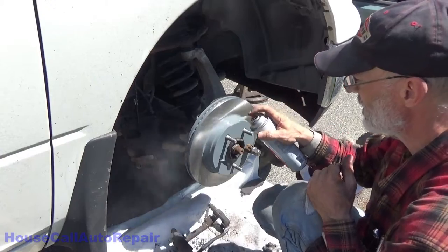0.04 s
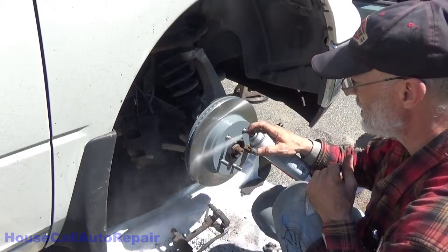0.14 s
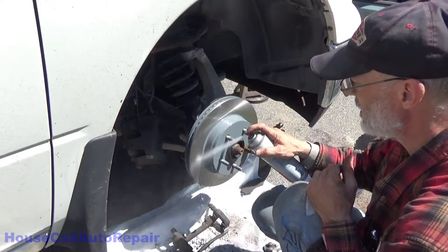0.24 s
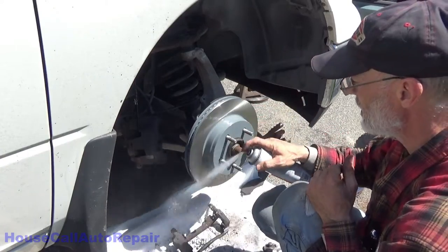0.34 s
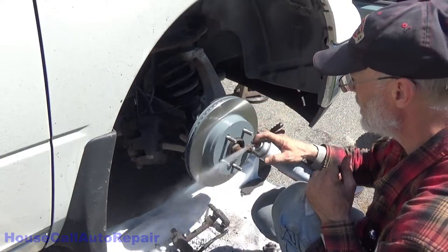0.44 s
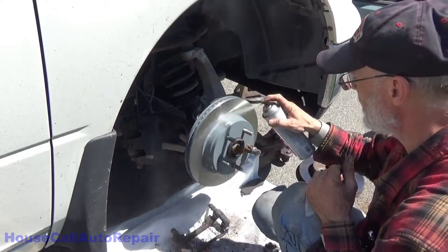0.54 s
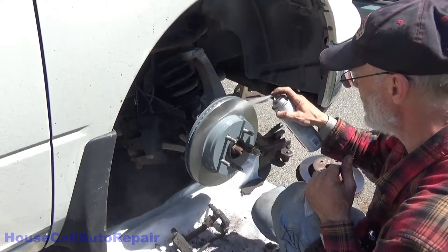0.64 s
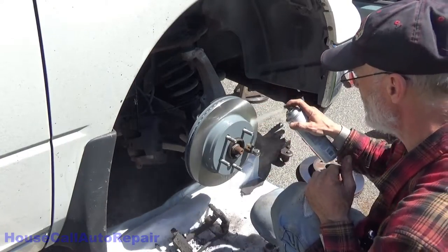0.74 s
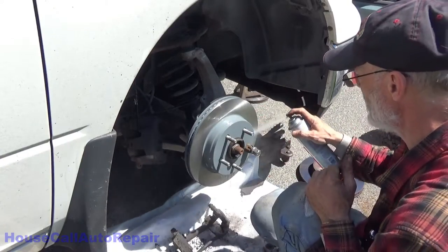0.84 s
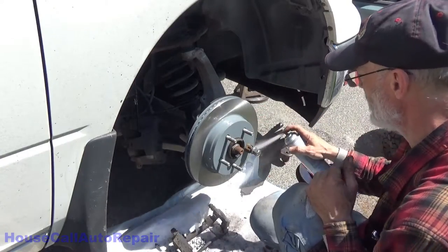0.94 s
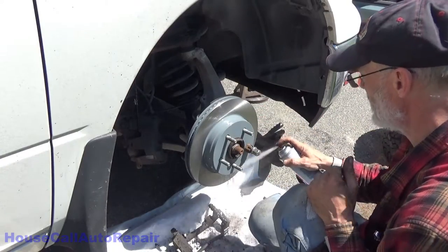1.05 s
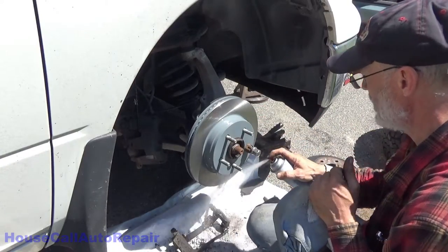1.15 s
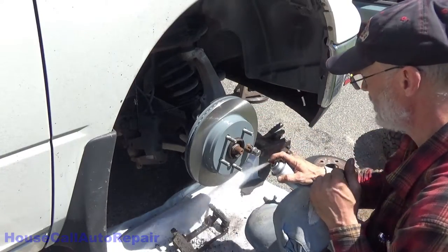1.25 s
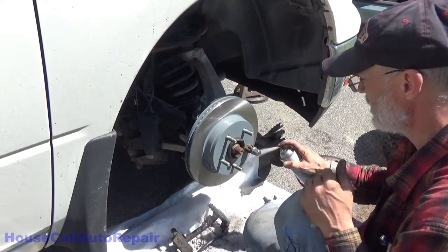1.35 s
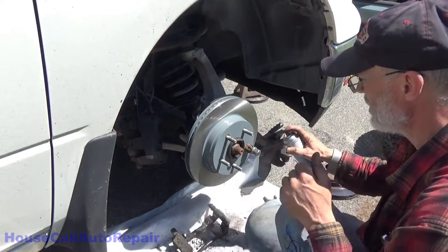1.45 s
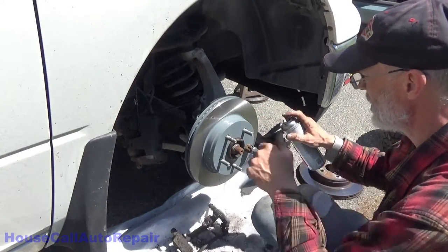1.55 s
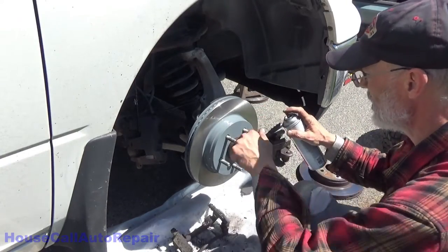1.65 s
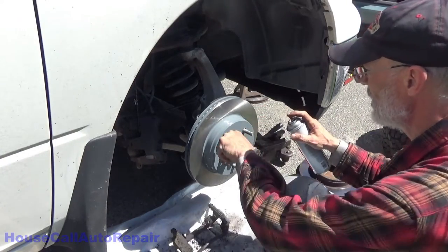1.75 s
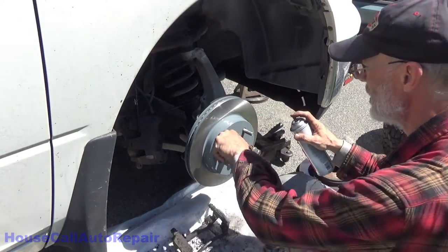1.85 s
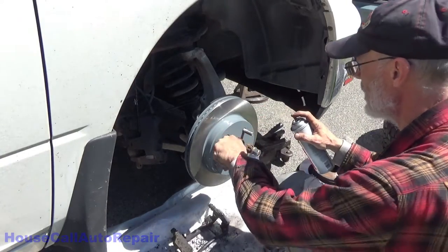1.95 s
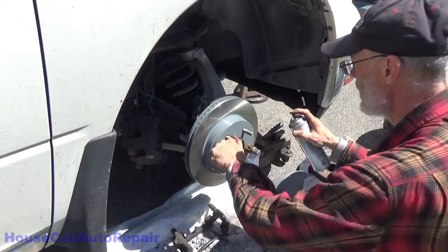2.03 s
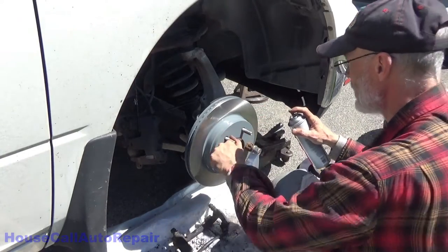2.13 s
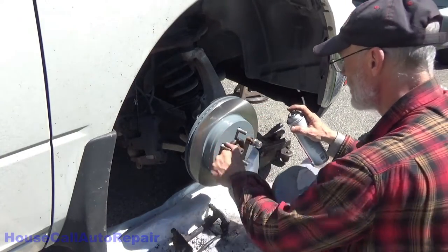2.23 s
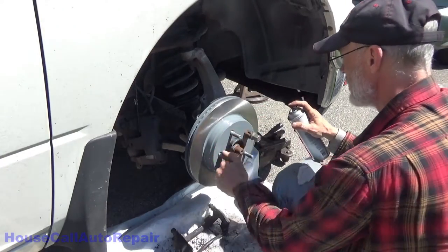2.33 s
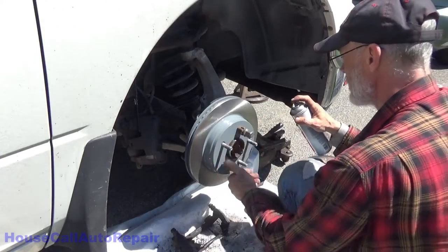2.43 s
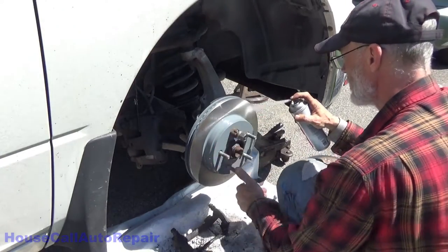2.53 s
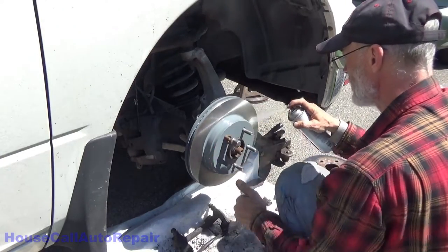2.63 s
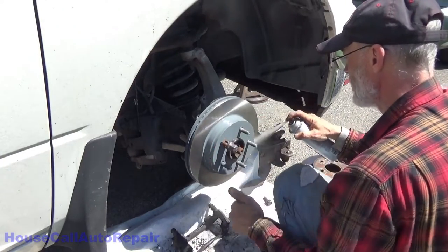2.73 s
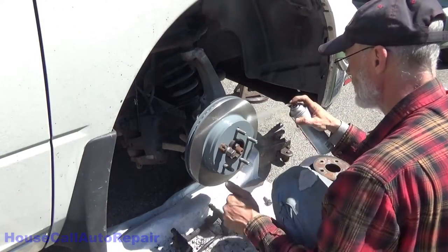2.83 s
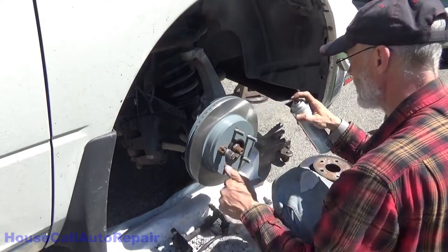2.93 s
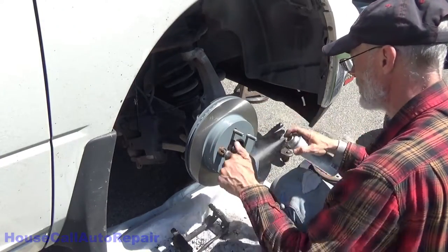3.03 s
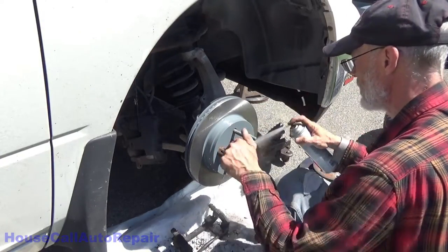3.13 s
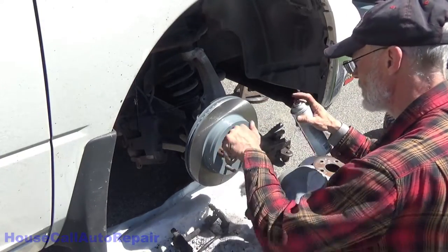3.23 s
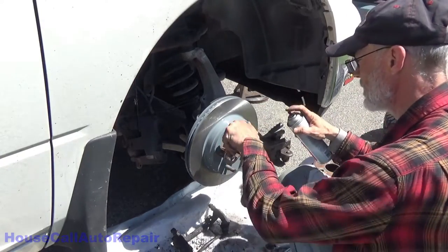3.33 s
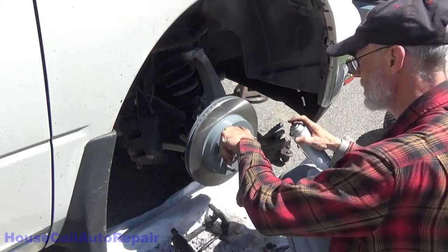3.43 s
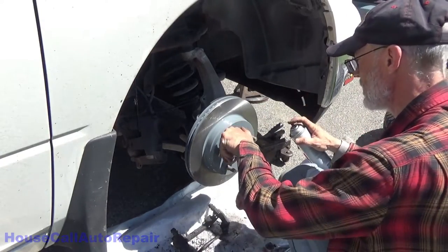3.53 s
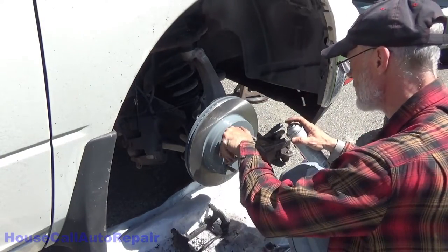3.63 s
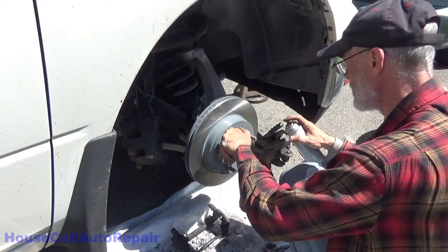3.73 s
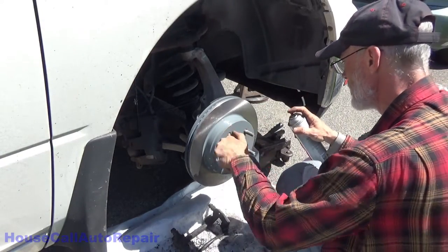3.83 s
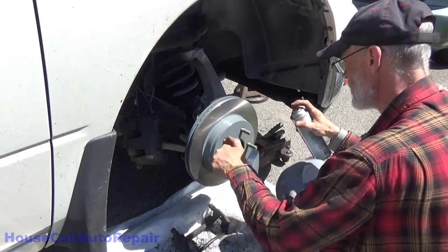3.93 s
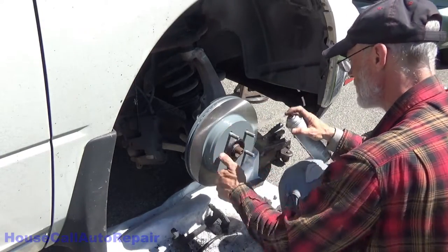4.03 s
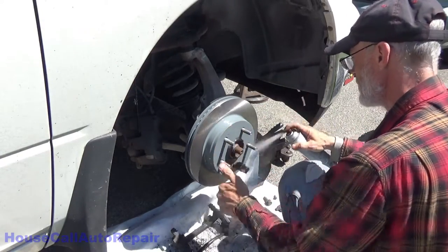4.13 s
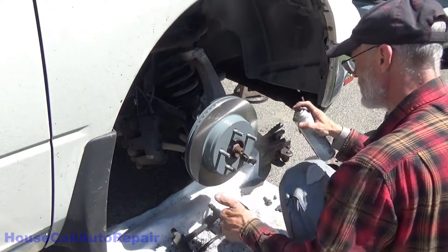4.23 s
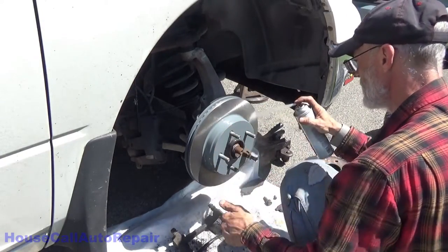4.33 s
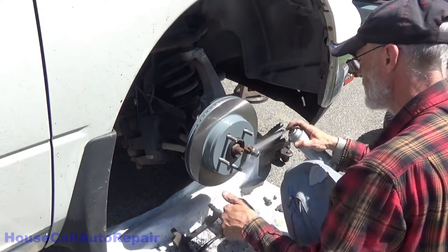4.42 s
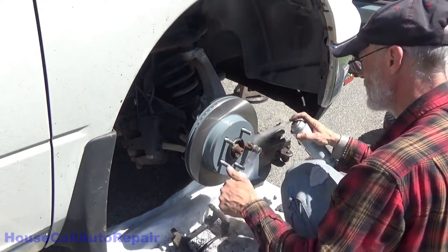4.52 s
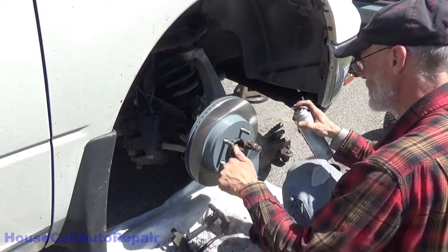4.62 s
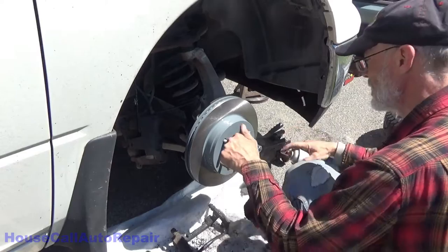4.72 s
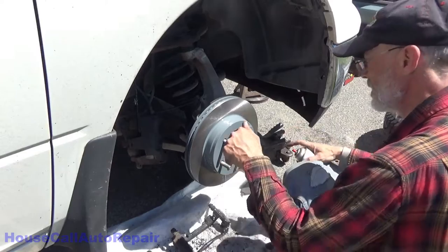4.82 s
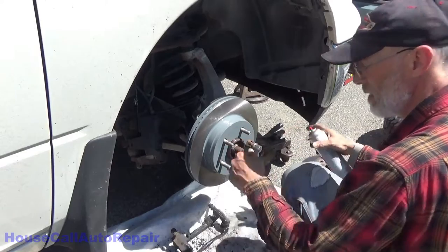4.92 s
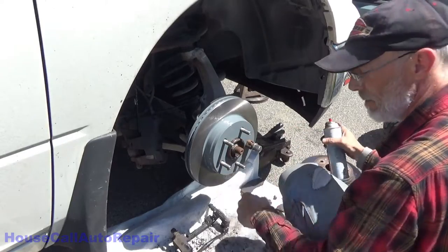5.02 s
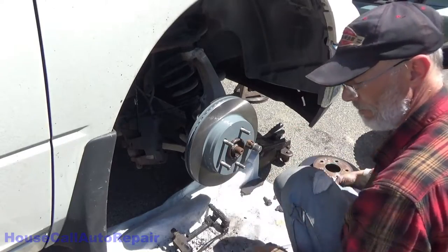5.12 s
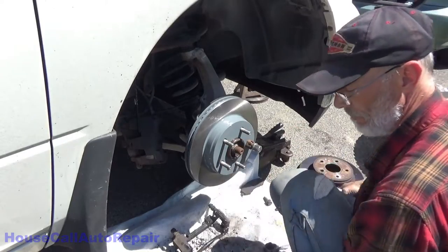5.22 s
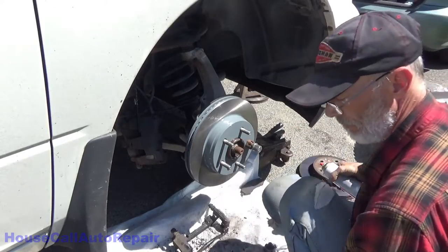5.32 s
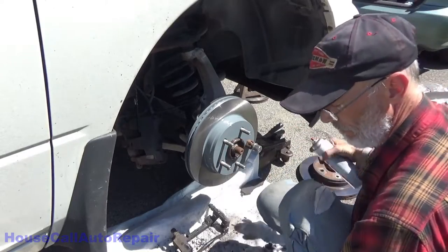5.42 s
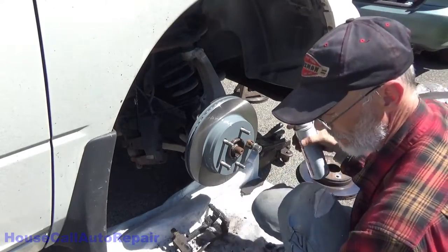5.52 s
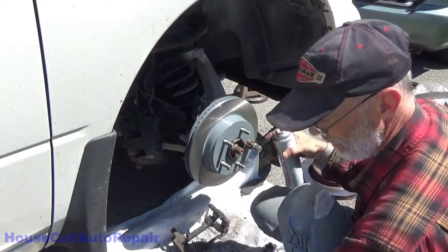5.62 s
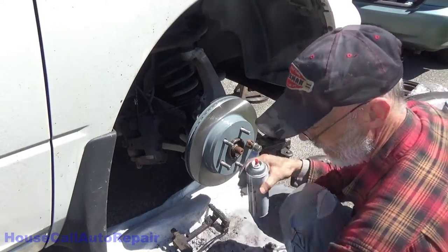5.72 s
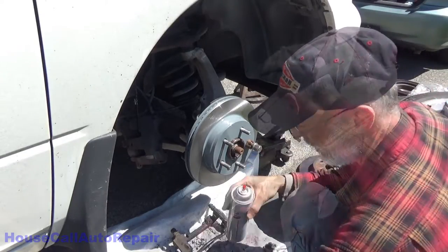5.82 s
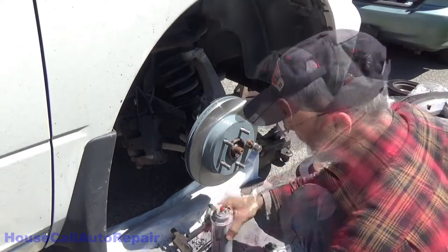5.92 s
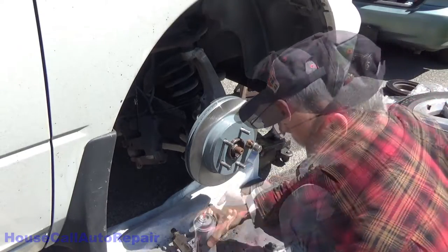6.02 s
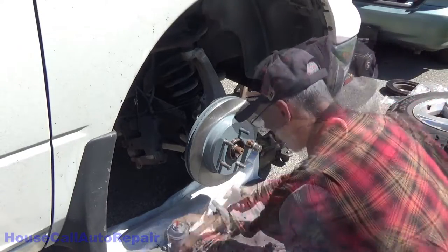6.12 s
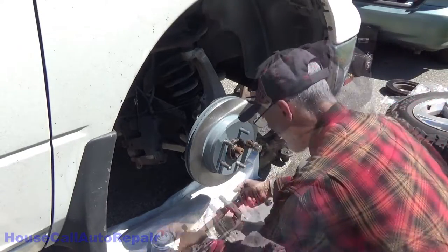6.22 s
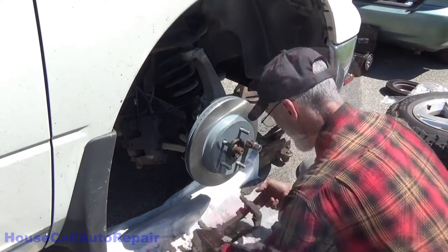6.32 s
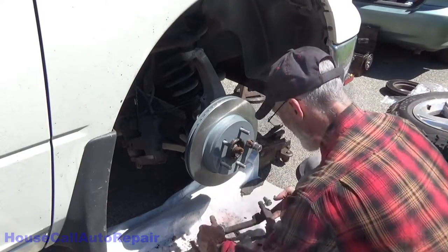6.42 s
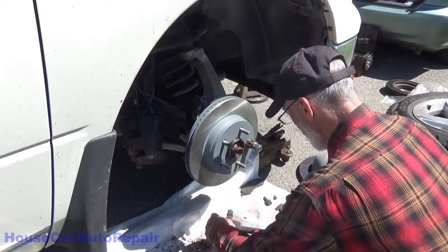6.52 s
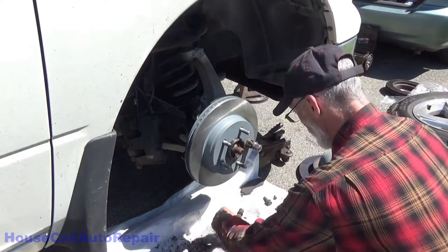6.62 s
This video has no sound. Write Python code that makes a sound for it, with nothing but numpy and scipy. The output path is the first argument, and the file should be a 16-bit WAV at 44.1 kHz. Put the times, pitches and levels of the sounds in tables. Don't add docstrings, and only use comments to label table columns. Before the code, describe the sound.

Outdoors beside a van, a loud, bright aerosol hiss is already running at 0 s, striking an iron brake disc. Its colour sweeps as the can moves, with gulping spatter and a breathy hollow tone rising around 1.1 to 1.4 s. It cuts off sharply at about 1.46 s, leaving a wet fizz that dies away, with small grit ticks and dull finger taps. At 2.5 s a tiny rising whistle opens a second jet, lasting until 3.2 s. More taps and ticks follow. A sharper chirp at 4.0 s starts a last, splashier jet, ending at 4.7 s. Around 5.1 to 5.4 s come a cluster of taps and two soft cloth strokes, then sparse clicks, one clearer at 6.2 s. Faint traffic wash, rustle and a low motor hum lie underneath, sinking after 5.7 s. The microphone is near, in stereo, with a short wheel-arch reflection.

```python
import sys
import numpy as np
from scipy import signal
from scipy.fft import rfft, irfft, next_fast_len
from scipy.io import wavfile
from scipy.ndimage import map_coordinates

SR = 44100
rng = np.random.default_rng(int(sys.argv[2]) if len(sys.argv) > 2 else 0)


def unload_wav(signal):
    wavfile.write(
        sys.argv[1],
        SR,
        np.round(np.clip(np.atleast_2d(signal).T, -1, 1) * 32767).astype(np.int16),
    )


def makeup_ratio(level_db):
    decades = np.asarray(level_db, float) / 20
    return 10 ** decades


N = 293645
TIME_S = np.arange(N) / SR

# [opens_s, shuts_s, rise_ms, fall_db_per_ms]
VALVE_PRESSES = [
    (-.1, 1.458, 3, 1.8),
    (2.532, 3.21, 8.4, 1.6),
    (4.0095, 4.701, 3, 1.6),
]
# [hiss_db, top_db over hiss, spatter_db, splash_db, stem_fill_s]
JET_STRENGTHS = [
    (-17.5, -6.5, -32, -44, .005),
    (-18, -8, -33.5, -46.5, 0.067),
    (-18, -7.5, -34.5, -47.5, .01),
]
# [pitch_hz, level_db per Hz]
HISS_COLOUR = [(2600, -11), (3300, -7.5), (3900, -1.5), (4800, -5), (5500, -7.5), (6200, -5.5),
               (7400, -3.5), (8400, -5), (9200, -7), (11000, -6.5), (12100, -11.5), (14100, -19.5),
               (15600, -24), (16500, -30)]
# [pitch_hz, level_db per Hz]
LIQUID_COLOUR = [(200, -23.5), (300, -18), (466, -8.5), (600, -14), (870, -10.5), (1170, -9), (1750, -3.5),
                 (2600, 0)]
# [pitch_hz, likeness 0-1]
JET_LIKENESS = [(300, 1), (700, 0.98), (1500, 1), (3000, 0.98), (4500, 1), (7000, 0.99), (10000, 0.96),
                (15000, .95)]
# [pitch_hz, balance_db]
JET_BALANCE = [(250, 0.1), (700, .4), (1500, 5.5), (3500, -2.4), (7000, 0.5), (12000, -0.5)]
# [start_s, disc_echo_ms, hub_echo share]
HAND_PATHS = [
    [(0, .415, 0), (.4, .4, -.05), (.62, .412, .05), (.8, .388, -.15), (.99, .365, -.22), (1.1, .38, -.28),
     (1.23, .42, -.32), (1.33, .4, -.3), (1.45, .382, -.25)],
    [(2.55, .425, .1), (2.8, .433, -.08), (3.05, .433, -.1), (3.2, .412, -.16)],
    [(4.02, .418, -.1), (4.2, .422, 0), (4.33, .44, -.07), (4.55, .44, -.2), (4.7, .434, -.1)],
]
# [offset_hz from its centre, level_db per Hz]
NOZZLE_SHAPE = [(5, 1), (600, -1), (900, -6.5), (1200, -14), (1600, -34)]
# [middle_s, splash_gain_db, spatter_gain_db]
LIQUID_GULPS = [(.032, 7.5, 1.5), (.08, 3.5, -2.5), (.36, 2, 0), (.584, 4.5, 0), (.69, -1, -1),
                (1.11, 6.5, 3.5), (1.25, 3.5, 0.5), (1.41, 7.5, 1), (2.6, 5, 2), (2.68, 3.5, 0),
                (2.95, 3, -1), (3.09, 6.5, 0.5), (4.045, 9, 7), (4.234, 11.5, -1), (4.374, 10, 1.5),
                (4.47, 5, 2)]
# [middle_s, half_length_s, pitch_hz, glide_hz_per_s, level_db]
HOLLOW_NOTES = [
    (.03, .14, 2835, -300, -31),
    (1.12, 0.075, 1805, 901, -34.5),
    (1.38, .2, 2110, 1250, -32),
    (3.0, .4, 2395, 0, -40.5),
    (4.05, .035, 1037, 1000, -35.5),
]
# [offset_hz from its centre, level_db per Hz]
HOLLOW_SHAPE = [(5, -1), (90, -4), (200, -9), (400, -27)]
# [start_s, pitch_hz, level_db]
VALVE_WHISTLES = [
    [(2.5, 2430, -55), (2.508, 2500, -40), (2.524, 2660, -33.5), (2.536, 2800, -33), (2.545, 2897, -50)],
    [(3.993, 2094, -60), (4.001, 2310, -39), (4.006, 2400, -40), (4.012, 2390, -26), (4.02, 2400, -44)],
]
# [multiple of the pitch, level_db]
WHISTLE_PARTIALS = [(1, -10), (2, -1), (3, -7.5), (4, -25)]
# [middle_s, half_length_s, level_db]
CLOTH_STROKES = [
    (5.17, 0.057, -48),
    (5.373, 0.069, -51.5),
]
# [pitch_hz, width_hz, level_db]
CLOTH_PEAKS = [(4960, 950, 1), (8300, 1200, -4)]
# [start_s, peak_db]
GRIT_TICKS = [(1.6342, -43), (1.8417, -40), (2.0906, -47), (2.1593, -44), (3.3544, -48), (3.4964, -45),
              (3.5753, -42), (3.5922, -42), (3.7409, -46), (3.8317, -42), (3.897, -45), (4.7686, -39),
              (4.9312, -42), (5.0609, -46), (5.1791, -34), (5.5644, -48), (5.7169, -41), (5.7379, -46),
              (5.7688, -44), (5.8137, -47), (6.1794, -46), (6.2118, -35), (6.353, -44), (6.6398, -44)]
# [start_s, peak_db, pitch_hz]
FINGER_TAPS = [(1.7224, -39, 3820), (1.8344, -40, 6660), (1.87, -37, 3740), (3.275, -34, 4850),
               (3.3817, -41, 4960), (3.9814, -40, 4580), (5.1144, -38, 4830), (5.1844, -34, 5440),
               (5.199, -31, 5500), (5.23, -33, 5550), (5.2714, -37, 5140), (5.6835, -41.5, 5070)]
# [pitch_hz, level_db per Hz]
TRAFFIC_COLOUR = [(20, -14), (48, -22.5), (100, -10), (126, -6.5), (196, -11), (256, -8.5), (313, -8),
                  (430, -3), (536, -7.5), (641, -5), (1310, -5), (2200, -5.5), (3200, -7.5), (3600, -12.5)]
# [pitch_hz, width_hz, level_db
YARD_PEAKS = [(656.85, 150, -8.5), (1002, 5.1, 4.5), (1472, 55, -1.5), (1900, 150, -4), (2770, 100, -4.5),
              (3394, 60, 1)]
# [pitch_hz, level_db per Hz]
RUSTLE_COLOUR = [(3600, -5), (4940, -6.5), (6480, -9.5), (10000, -16.5), (12500, -24.5), (16200, -25)]
# [pitch_hz, likeness 0-1]
YARD_LIKENESS = [(60, 0.93), (130, 1.0), (290, 0.97), (640, 0.92), (1410, 0.81), (3100, 0.82), (6820, 0.87),
                 (15000, 0.95)]
# [pitch_hz, balance_db]
YARD_BALANCE = [(60, -2), (180, -1.5), (550, 2), (1650, 3), (4970, 1.0), (15000, -0.5)]
# [time_s, level_db]
YARD_LATE_LEVEL = [(5.3, 1), (5.7, -1), (5.9, -3), (6.45, -3.5), (6.63, -0.5)]


def jet():
    hiss_db, top_db, spatter_db, splash_db = jet_levels()
    face_ms, hub = in_time(sum(HAND_PATHS, []))

    body, top = split(coloured(HISS_COLOUR, JET_LIKENESS, JET_BALANCE), hz=8930)
    splash, spatter = split(coloured(LIQUID_COLOUR, JET_LIKENESS), hz=990)
    hiss = 0.76 * rms_one(body) + nozzle(face_ms) + makeup_ratio(top_db + 1.3 * drift(30)) * rms_one(top)
    hiss = makeup_ratio(hiss_db - 0.42 + 0.54 * drift(25)) * hiss
    lean_db = -0.65 + 0.6 * drift(8)
    hiss = hiss * makeup_ratio(np.array([lean_db, -lean_db]) * 0.37)
    spray = hiss + makeup_ratio(spatter_db - 0.96 + 0.8 * drift(11)) * rms_one(spatter)

    face, hub = 0.13 * (1 + 0.25 * drift(3.4)), 0.94 * hub
    echoes = face * delayed(spray, face_ms) + hub * delayed(spray, 1.234 * face_ms)
    spray = (spray + echoes) / np.sqrt(1 + face ** 2 + hub ** 2)

    spray += makeup_ratio(splash_db - 0.15 + 1.5 * drift(11)) * rms_one(splash)
    spray += hollow()
    scattered = np.zeros_like(spray)
    for echo_ms in (0.85, 1.4, 2.3):
        strength = 0.2 * drift(5.5)
        scattered += strength * delayed(spray, echo_ms * (1 + 0.043 * drift(1.82)))
    return valve() * (spray + scattered) / 1.083


def valve():
    flow = np.zeros(N)
    for opens, shuts, rise_ms, fall_db in VALVE_PRESSES:
        opening = np.clip((TIME_S - opens) * 1000 / rise_ms, 0, 1)
        flow += opening * makeup_ratio(-fall_db * 1000 * np.maximum(TIME_S - shuts, 0))
    return flow


def jet_levels():
    empty_stem_db, sputter_db, sputter_s, gulp_s = -5, 2.5, 0.066, 0.025
    opens, shuts = np.transpose(VALVE_PRESSES)[:2]
    which = np.maximum(np.searchsorted(opens - 0.05, TIME_S) - 1, 0)
    hiss_db, top_db, spatter_db, splash_db, fill_s = np.transpose(JET_STRENGTHS)[:, which]
    empty_db = empty_stem_db * np.exp(-np.maximum(TIME_S - opens[which], 0) / fill_s)
    spatter_db = spatter_db + empty_db + sum(sputter_db * bump(s, sputter_s) for s in shuts)
    for middle_s, low_db, high_db in LIQUID_GULPS:
        gulp = bump(middle_s, gulp_s)
        splash_db = splash_db + low_db * gulp
        spatter_db = spatter_db + high_db * gulp
    return hiss_db + empty_db, top_db - empty_db, spatter_db, splash_db + empty_db


def nozzle(face_ms):
    usual_hz, usual_ms, follows, wander = 4624, 0.42, 0.6, 0.03
    hz = usual_hz * (usual_ms / face_ms) ** follows * (1 + wander * drift(4))
    return makeup_ratio(-4.5) * carried(hz, NOZZLE_SHAPE)


def hollow():
    swells = np.array([makeup_ratio(db) * bump(s, half_s) for s, half_s, _, _, db in HOLLOW_NOTES])
    loudest = swells.argmax(axis=0)
    middle_s, _, hz, glide, _ = np.transpose(HOLLOW_NOTES)[:, loudest]
    return swells.sum(axis=0) * carried(hz + glide * (TIME_S - middle_s), HOLLOW_SHAPE)


def whistle():
    out = np.zeros(N)
    for rows in VALVE_WHISTLES:
        hz, level_db = in_time(rows)
        gate = makeup_ratio(level_db) * (TIME_S > rows[0][0]) * (TIME_S < rows[-1][0])
        turn = 2 * np.pi * np.cumsum(hz) / SR
        for multiple, partial_db in WHISTLE_PARTIALS:
            breath = rng.standard_normal(N)
            for _ in range(2):
                breath = signal.lfilter([1], [1, -0.955], breath)
            out += gate * makeup_ratio(partial_db) * (0.52 + rms_one(breath)) * np.sin(np.round(multiple) * turn)
    return out


def van_side(x):
    t60_s, level_db = 0.13, -15
    t = np.arange(int(0.25 * SR)) / SR
    tail = rng.standard_normal((2, len(t))) * makeup_ratio(-60 * t / t60_s) * (t > 0.003)
    tail = 0.88 * tail[0] + 0.36 * tail
    return makeup_ratio(level_db) * signal.fftconvolve(x, tail / np.linalg.norm(tail[0]), axes=1)[:, :N]


def drag():
    grains = rng.standard_normal(N) * makeup_ratio(1.9 * drift(70))
    strokes = sum(makeup_ratio(db) * bump(s, half_s) for s, half_s, db in CLOTH_STROKES)
    rub = np.zeros(N)
    for hz, width_hz, db in CLOTH_PEAKS:
        rub += makeup_ratio(db) * resonance(resonance(grains, hz, width_hz), hz, width_hz)
    return strokes * rms_one(rub)


def ticks():
    out, t = np.zeros(N + 2000), np.arange(2000) / SR
    rows = [(s, db, 8200, 6300, 0.014) for s, db in GRIT_TICKS]
    rows += [(s, db, hz, 3900, 0.045) for s, db, hz in FINGER_TAPS]
    for s, peak_db, hz, width_hz, t60_s in rows:
        crack = rng.standard_normal(len(t)) * makeup_ratio(-60 * t / t60_s)
        crack = resonance(resonance(crack, hz, width_hz), hz, width_hz)
        out[round(s * SR):][:len(t)] += makeup_ratio(peak_db - 0.5) * crack / np.abs(crack).max()
    return out[:N]


def yard():
    traffic_db, rustle_db, hum_db, hum_hz = -48, -55.5, -60, 170.7
    wet_db, wet_rustle_db, drying_s = 3, 4.5, 0.46
    wet = np.zeros(N)
    for _, shuts, _, _ in VALVE_PRESSES:
        wet += (TIME_S > shuts) * np.exp(-np.maximum(TIME_S - shuts, 0) / drying_s)
    late_db, = in_time(YARD_LATE_LEVEL)

    wash = coloured(TRAFFIC_COLOUR, YARD_LIKENESS, YARD_BALANCE)
    ring = sum(makeup_ratio(db) * resonance(wash, hz, width_hz) for hz, width_hz, db in YARD_PEAKS)
    traffic = makeup_ratio(traffic_db + wet_db * wet + late_db + 0.62 * drift(8.7)) * rms_one(wash + ring)

    rustle_db = rustle_db + wet_rustle_db * wet + late_db + 0.8 * drift(60) + 0.46 * drift(4)
    rustle = makeup_ratio(rustle_db) * coloured(RUSTLE_COLOUR, YARD_LIKENESS, YARD_BALANCE)

    hum_db = hum_db - 7.5 * np.maximum(TIME_S - 5.3, 0)
    hum = np.sqrt(2) * makeup_ratio(hum_db + 1.8 * drift(6)) * np.sin(2 * np.pi * hum_hz * TIME_S)
    return traffic + rustle + hum


def carried(hz, shape):
    turn = 2 * np.pi * np.cumsum(hz) / SR
    alike = [(10, 0.95), (2000, 1.0)]
    return coloured(shape, alike) * np.cos(turn) + coloured(shape, alike) * np.sin(turn)


def coloured(spectrum, likeness, balance=((100, 0), (9000, 0))):
    size = next_fast_len(N)
    hz = np.maximum(np.fft.rfftfreq(size, 1 / SR), 1)
    mid, side = rfft(rng.standard_normal((2, size)))
    alike = np.clip(at_hz(likeness, hz), 0, 1)
    lean = makeup_ratio(at_hz(balance, hz) / 2)
    mid, side = np.sqrt(1 + alike) * mid, np.sqrt(1 - alike) * side
    inside = (hz > spectrum[0][0]) & (hz < spectrum[-1][0])
    both = makeup_ratio(at_hz(spectrum, hz)) * inside * [(mid + side) * lean, (mid - side) / lean]
    return rms_one(irfft(both, size)[:, :N])


def resonance(x, hz, width_hz):
    r = np.exp(-np.pi * width_hz / SR)
    forward = np.array([1, 0, -1]) * (1 - r * r) / 2
    return signal.lfilter(forward, [1, -2 * r * np.cos(2 * np.pi * hz / SR), r * r], x)


def split(x, hz):
    low = signal.sosfiltfilt(signal.butter(2, hz, fs=SR, output="sos"), x)
    return low, x - low


def delayed(x, ms):
    at = np.arange(N) - ms * SR / 1000
    return np.array([map_coordinates(c, [at], order=3, mode="wrap") for c in x])


def drift(rate):
    r = np.exp(-80 * np.pi * rate / SR)
    noise = rng.standard_normal(N // 40 + 2002)
    slow = signal.lfilter([1], [1, -2 * r, r * r], noise)[2000:]
    return np.interp(np.arange(N) / 40, np.arange(len(slow)), rms_one(slow - slow.mean()))


def bump(middle_s, half_s):
    return np.exp(-((TIME_S - middle_s) / half_s) ** 2)


def in_time(rows):
    s, *columns = np.transpose(rows)
    return [np.interp(TIME_S, s, c) for c in columns]


def at_hz(points, hz):
    point_hz, value = np.transpose(points)
    return np.interp(np.log(hz), np.log(point_hz), value)


def rms_one(x):
    return x / np.sqrt(np.mean(x ** 2) + 1e-20)


def scene():
    can = jet() + whistle()
    return can + van_side(can) + drag() + ticks() + yard()


def top_cut(x):
    return signal.sosfilt(signal.butter(12, 16042, fs=SR, output="sos"), x)


def record(dry):
    low_pass = signal.ellip(12, 0.2, 70, 15800, fs=SR, output="sos")
    mix = signal.sosfilt(low_pass, dry)
    return top_cut(mix)


dry = scene()
out = record(dry)
unload_wav(out)
```